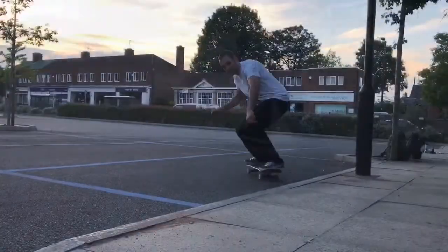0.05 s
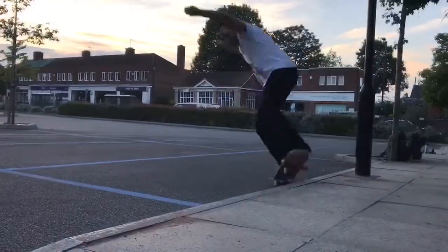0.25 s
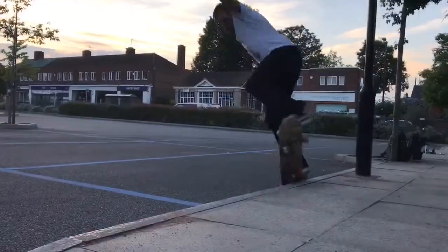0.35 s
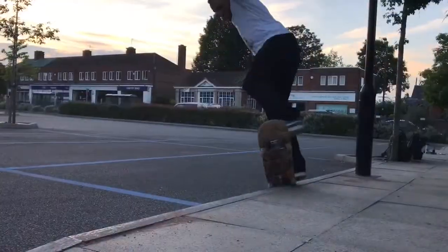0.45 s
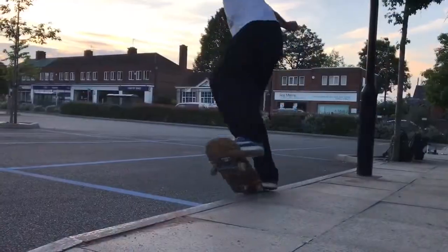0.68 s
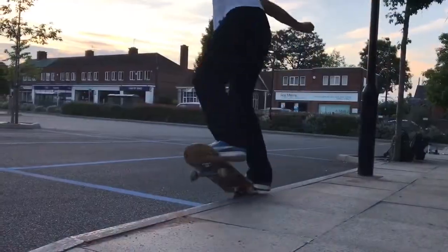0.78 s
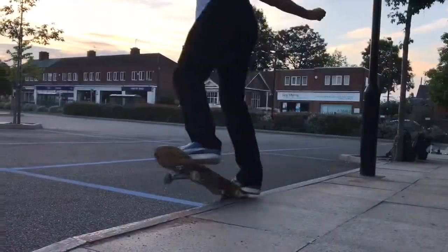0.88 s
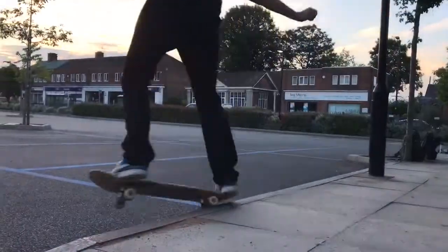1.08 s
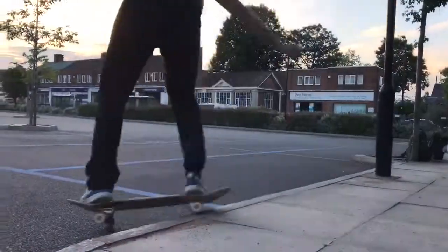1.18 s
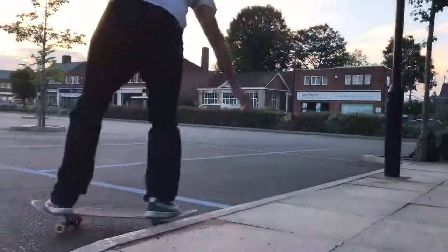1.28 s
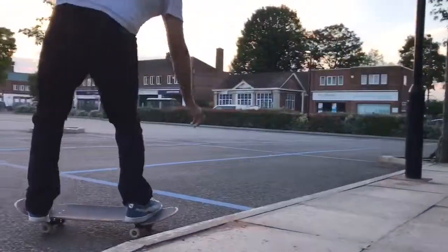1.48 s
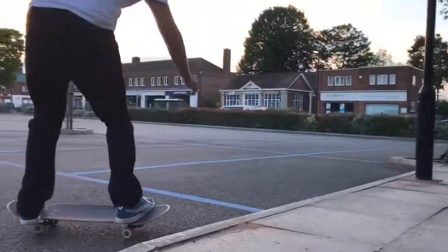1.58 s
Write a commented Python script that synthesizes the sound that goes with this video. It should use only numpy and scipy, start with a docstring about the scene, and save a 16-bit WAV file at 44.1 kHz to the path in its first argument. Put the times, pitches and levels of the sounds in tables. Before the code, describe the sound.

Close by, a skateboard grinds a kerb: a brief rise of wheel noise, a loud clatter, a gritty metallic scrape, then a hard woody landing. Faint far traffic and a low hum lie behind it in the open car park.

```python
"""An open car park, with far traffic, a low hum and a faint tail off the ground and buildings.
Close to the microphone a skateboard rolls up over asphalt, clacks onto a concrete kerb and grinds
along its edge: the truck sticks and slips, ringing the deck. Rear wheels, tail and front wheels
slam down and the board rolls off. At this distance the hardest blows overload the microphone."""
import sys
import numpy as np
from scipy import signal
from scipy.fft import rfft, irfft, next_fast_len
from scipy.io import wavfile
from scipy.ndimage import uniform_filter1d

SR = 44100
rng = np.random.default_rng(int(sys.argv[2]) if len(sys.argv) > 2 else 0)


def file_out(sig):
    """Save sig as 16-bit WAV at sys.argv[1]."""
    # one column per channel
    cols = np.atleast_2d(sig).T
    # limit, then scale
    lim = np.clip(cols, -1, 1)
    pcm = np.round(lim * 32767).astype(np.int16)
    wavfile.write(sys.argv[1], SR, pcm)


N = 72765

# spectrum of the distant town: f/Hz, level/dB
TOWN_COLOUR = [(25, -6), (70, -12), (200, -13.5), (1300, -10.5), (16000, -36)]
# roar of the wheels on asphalt: t/s, level/dB
ROLL_LEVELS = [(0, -37.5), (.2, -28.5), (.27, -25), (.31, -28), (.368, -17.5), (.45, -43.5), (1.25, -46.5),
               (1.3, -26), (1.39, -34), (1.49, -49), (1.7, -51)]
# its spectrum: f/Hz, level/dB
ROLL_COLOUR = [(80, -44.5), (230, 3.5), (450, 1.5), (700, -2), (1050, -3), (1300, -10), (2200, -23),
               (16000, -35)]
# rumble of the loaded board: t/s, level/dB
RUMBLE_LEVELS = [(-.05, -36.5), (.35, -44.5), (.7, -33.5), (.87, -42), (1.18, -35.5), (1.24, -41),
                 (1.41, -35.5), (1.5, -51.5), (1.7, -40.5)]
# its spectrum: f/Hz, level/dB
RUMBLE_COLOUR = [(45, -50), (95, 0), (190, -2), (380, -33.5)]
# loose grit snapping under the wheels: t/s, level/dB, f/Hz
GRIT_SNAPS = [(0.153, -37.5, 12000), (0.2547, -35, 10300), (1.426, -44.5, 6900), (1.576, -41.5, 4400),
              (1.61, -45, 4650)]
# resonances of the flexing board, deck, truck and axle: f/Hz, width/Hz, level/dB
THUMP_MODES = [(68, 22, -8), (95.5, 21.5, 7.5), (186, 19, 2.5)]
DECK_MODES = [(240, 86, 3.4), (434, 50, 4.5), (533, 210, 2.25), (733, 143, 0.44)]
TRUCK_MODES = [(845, 30, 2.5), (1099, 122, 3.5), (1364, 58, 2.5), (1364, 110, 2), (1520, 158, 6.5),
               (1913, 300, 1), (2375, 86, -0.5), (2620, 128, -0.5)]
AXLE_MODES = [(2380, 200, 10), (3850, 98, 8), (4260, 160, -8), (6140, 400, -3.5)]
# spectrum of stone crushed by a blow: f/Hz, level/dB
CRACK_COLOUR = [(800, -10.5), (2000, 5.5), (3800, 9.5), (6300, 0.5), (8000, -4.5), (12000, -8),
                (16000, -14)]
# blows on the board: t/s, thump/dB, deck/dB, truck/dB, crack/dB, contact decay/ms
BLOWS = [(0.3756, -50, -25, -10.5, -16, 11.3), (0.394, -28, -47, -16, -17.5, 8.5),
         (0.4041, -30.5, -14.5, -10.5, -14.5, 5.8), (0.4286, -39, -51, -15, -19.5, 11),
         (0.4356, -50, -22, -13, -15.5, 3.4), (0.4497, -45, -17, -18.5, -16, 5.3),
         (0.4812, -53, -26.5, -13.5, -20, 20), (0.66, -42, -29, -24, -27, 2.8),
         (0.7303, -25.5, -22.5, -12.5, -19, 3.5), (0.944, -60, -61, -20.5, -30, 0.68),
         (1.021, -56, -56, -20, -30, 1.7), (1.274, -29, -25.5, -26, -24, 4.1),
         (1.2794, -20, -37, -19.5, -24.5, 7.1), (1.2871, -36, -30, -20, -27, 2.5),
         (1.291, -29, -10, -43, -21, 0.64), (1.307, -25, -24, -24.5, -28.5, 1.1),
         (1.336, -29.5, -19.5, -44, -50, 2.5), (1.3593, -35, -22.5, -44, -34, 1.8),
         (1.519, -43, -34.5, -73, -49, 3)]
# rear, then front wheels land: t/s, deck/dB, clack/Hz, clack/dB, axle/dB, crack/dB, contact decay/ms
LANDINGS = [(1.2533, -13.5, 1256, -21.5, -24.5, -19, 2.1), (1.3444, -21.5, 1530, -9.5, -11.5, -17.5, 1.9)]
# a low boom during the grind: t/s, f/Hz, level/dB
BOOM_TRACK = [(.402, 292, -21), (.465, 249.4, -21.5), (.54, 234.7, -31.5), (.61, 258.5, -27),
              (.67, 208, -36.5), (.825, 197.4, -38)]
# the three voices of the grind: t/s, scrape/dB, deck drone/dB, gritty hiss/dB
GRIND_LEVELS = [(.29, -40.5, -75, -55), (.372, -36, -38, -27), (.447, -40, -41, -36),
                (.456, -17.5, -16.5, -16.5), (.515, -23, -19, -29), (.6, -22, -20.5, -25.5),
                (.69, -26, -23.5, -35), (.785, -32, -31.5, -37), (.86, -33.5, -37.5, -42),
                (.93, -31, -32, -34), (1.015, -27, -29.5, -31.5), (1.055, -33.5, -36.5, -35),
                (1.11, -27, -32.5, -29.5), (1.185, -42, -40.5, -32.5), (1.215, -62, -58, -51)]
# their spectra: f/Hz, level/dB
SCRAPE_COLOUR = [(300, -26.5), (760, -17), (900, -12.5), (1200, 0), (1550, 10), (2200, 5.5), (2900, -12.5),
                 (12000, -37)]
DRONE_COLOUR = [(90, -38.5), (200, -0.5), (310, -4.5), (780, -7.5), (890, 2.5), (1300, 2.5), (2000, -43)]
HISS_COLOUR = [(1000, 3.5), (3000, 2), (4600, -5), (7400, -11.5), (9000, -7.5), (10500, -16), (12000, -6.5),
               (16000, -17)]


def undb(db):
    """Decibels to gain."""
    return 10 ** (np.asarray(db) / 20)


def unit(x):
    """Scale to rms 1."""
    return x / np.sqrt(np.mean(x ** 2) + 1e-18)


def fader(rows, column=1):
    """Gain over time from a column of decibels; silent outside the rows."""
    rows = np.array(rows)
    return undb(np.interp(np.arange(N) / SR, rows[:, 0], rows[:, column], left=-120, right=-120))


def colour(x, points):
    """Minimum-phase filter through points of f/Hz, level/dB."""
    size = 2 * next_fast_len(len(x), real=True)
    hz, db = np.array(points).T
    f = np.maximum(np.fft.rfftfreq(size, 1 / SR), 1)
    gain = undb(np.interp(np.log(f), np.log(hz), db))
    cepstrum = irfft(np.log(gain))
    cepstrum[1:size // 2] *= 2
    cepstrum[size // 2 + 1:] = 0
    return irfft(rfft(x, size) * np.exp(rfft(cepstrum)))[:len(x)]


def ring(x, modes):
    """Drive damped resonances, summed with alternating signs."""
    return sum((-1) ** k * undb(db) * signal.lfilter(*signal.iirpeak(hz, hz / width, fs=SR), x)
               for k, (hz, width, db) in enumerate(modes))


def grains(per_s, decay_s, spread_db, steady):
    """Noise in short random bursts of uneven size over a steady share, evenly loud in the long run."""
    chance, size, noise = rng.random(N), rng.standard_normal(N), rng.standard_normal(N)
    kicks = (chance < per_s / SR) * undb(spread_db * size)
    envelope = unit(signal.lfilter([1], [1, -np.exp(-1 / (decay_s * SR))], kicks)) + steady
    return noise * envelope / np.sqrt(uniform_filter1d(envelope ** 2, size=1300))


def burst(decay_s, size=8000):
    """Noise that dies away."""
    return rng.standard_normal(size) * np.exp(-np.arange(size) / (SR * decay_s))


def at_level(x, db, window=265):
    """Set the rms level of the loudest window of samples."""
    return x * undb(db) / np.sqrt(uniform_filter1d(x ** 2, size=window, mode="constant").max())


def add(out, s, x):
    """Mix a sound in at s seconds."""
    i = max(int(s * SR), 0)
    out[i:i + len(x)] += x[:max(N - i, 0)]


def town(traffic_db=-49, hum_db=-44.5, hum_hz=54.3):
    """Far off, a wash of traffic and a steady low hum."""
    traffic = unit(colour(rng.standard_normal(N), TOWN_COLOUR))
    hum = np.sqrt(2) * np.sin(2 * np.pi * hum_hz * np.arange(N) / SR)
    return undb(traffic_db) * traffic + undb(hum_db) * hum


def car_park(direct, t60_s=0.14, tail_db=-24, cutoff_hz=2950):
    """Ground and buildings put a faint, dull tail behind the direct sound."""
    tail = rng.standard_normal(N) * undb(-60 * np.arange(N) / SR / t60_s)
    tail = signal.lfilter(*signal.butter(1, cutoff_hz, fs=SR), tail)
    return direct + undb(tail_db) * signal.fftconvolve(direct, tail / np.linalg.norm(tail))[:N]


def wheels(snap_q=1.3):
    """Hard wheels roar over the stones of the asphalt and snap loose grit; the loaded board rumbles."""
    stones = grains(per_s=600, decay_s=0.0008, spread_db=1.5, steady=1.5)
    roar = unit(colour(stones, ROLL_COLOUR)) * fader(ROLL_LEVELS)
    rumble = unit(colour(rng.standard_normal(N), RUMBLE_COLOUR)) * fader(RUMBLE_LEVELS)
    out = roar + rumble
    for s, db, hz in GRIT_SNAPS:
        snap = ring(burst(decay_s=0.0021), [(hz, hz / snap_q, 0)])
        add(out, s, at_level(snap, db))
    return out


def strike(crush_ms, rattle_db):
    """A short crush and the buzz of loose hardware."""
    contact = burst(crush_ms / 1000) + undb(rattle_db) * burst(decay_s=0.011)
    contact[0] = 1.7  # sharp first touch
    return contact


def force_on_wood(contact, rub_share=0.55):
    """One shove reaches the wood, plus a share of the rubbing."""
    push = rub_share * contact / np.linalg.norm(contact)
    push[0] += 1
    return push


def deck(push):
    """The deck's resonances answer a push with a hollow knock."""
    return signal.lfilter(*signal.butter(2, [190, 1400], "band", fs=SR), ring(push, DECK_MODES))


def knocks(flex_lag_s=0.0055):
    """Each blow rings deck and truck and crushes a little stone; the loaded board flexes just after."""
    out = np.zeros(N)
    for s, thump_db, deck_db, truck_db, crack_db, crush_ms in BLOWS:
        contact = strike(crush_ms, rattle_db=-20.5)
        push = force_on_wood(contact)
        truck = at_level(ring(contact, TRUCK_MODES), truck_db)
        crack = at_level(colour(contact, CRACK_COLOUR), crack_db)
        add(out, s, at_level(deck(push), deck_db) + truck + crack)
        thump = signal.lfilter(*signal.butter(2, [55, 300], "band", fs=SR), ring(push, THUMP_MODES))
        add(out, s + flex_lag_s, at_level(thump, thump_db, window=700))
    return out


def wheel_slaps(clack_width_hz=410):
    """Each pair of wheels hits the asphalt with a woody clack of its own pitch and a bright axle ring."""
    out = np.zeros(N)
    for s, deck_db, clack_hz, clack_db, axle_db, crack_db, crush_ms in LANDINGS:
        contact = strike(crush_ms, rattle_db=-13.5)
        push = force_on_wood(contact)
        clack_mode = [(clack_hz, clack_width_hz, 0)]
        clack = at_level(ring(ring(push, clack_mode), clack_mode), clack_db)
        axle = at_level(ring(push, AXLE_MODES), axle_db)
        crack = at_level(colour(contact, CRACK_COLOUR), crack_db)
        add(out, s, at_level(deck(push), deck_db) + clack + axle + crack)
    return out


def low_boom(width_hz=24):
    """A low boom during the grind, wavering down from about 290 to 200 Hz."""
    s, hz, _ = np.array(BOOM_TRACK).T
    phase = 2 * np.pi * np.cumsum(np.interp(np.arange(N) / SR, s, hz)) / SR
    sway = signal.lfilter(*signal.butter(2, width_hz / 2, fs=SR), rng.standard_normal((2, N)))
    tone = sway[0] * np.cos(phase) + sway[1] * np.sin(phase)  # narrow noise around the pitch
    tone /= np.sqrt(np.hypot(*sway))  # partly evens out the swells
    return unit(tone) * uniform_filter1d(fader(BOOM_TRACK, column=2), size=900)


def grind(ring_db=-7):
    """The truck sticks and slips on the kerb; its metal rings, the deck drones and grit crackles."""
    slips = grains(per_s=700, decay_s=0.0008, spread_db=1.5, steady=0.8)
    grit = grains(per_s=640, decay_s=0.0019, spread_db=9, steady=0.4)
    metal = undb(ring_db) * unit(ring(slips, TRUCK_MODES))
    scrape = unit(unit(colour(slips, SCRAPE_COLOUR)) + metal) * fader(GRIND_LEVELS, column=1)
    drone = unit(colour(slips, DRONE_COLOUR)) * fader(GRIND_LEVELS, column=2)
    hiss = unit(colour(grit + slips, HISS_COLOUR)) * fader(GRIND_LEVELS, column=3)
    return scrape + drone + hiss


def scene():
    """The town in the distance and the board up close, in mono."""
    background = town()
    board = grind() + low_boom() + wheels() + knocks() + wheel_slaps()
    return (background + car_park(board))[None]


def record(dry):
    """The close microphone flattens the hardest peaks towards full scale and cuts above 16 kHz."""
    clipped = dry / (1 + dry ** 6) ** (1 / 6)
    return signal.sosfilt(signal.ellip(10, .1, 80, 16000, fs=SR, output="sos"), clipped)


dry = scene()
out = record(dry)
file_out(out)
```